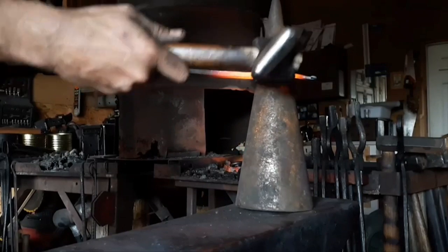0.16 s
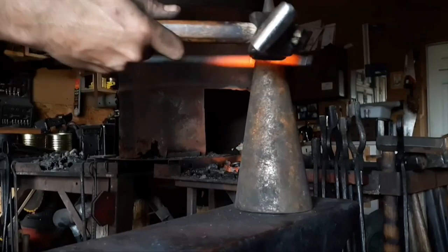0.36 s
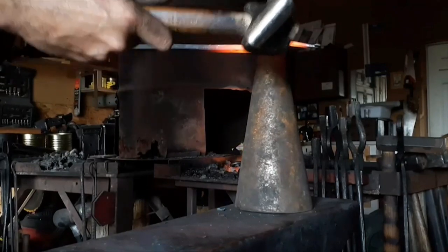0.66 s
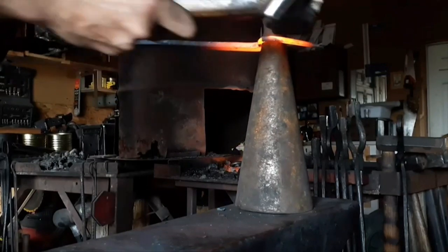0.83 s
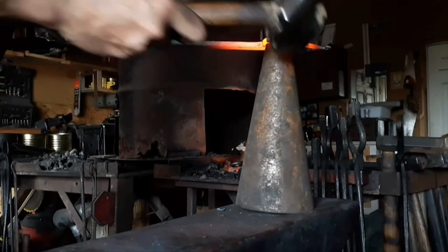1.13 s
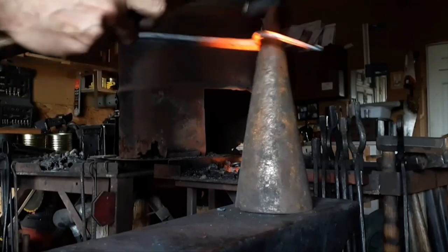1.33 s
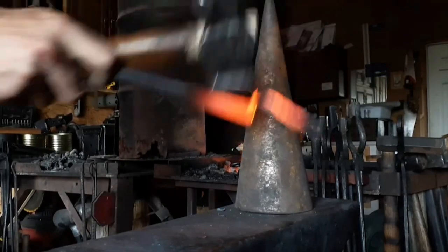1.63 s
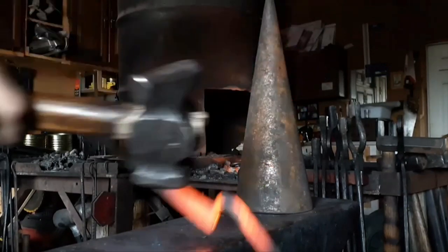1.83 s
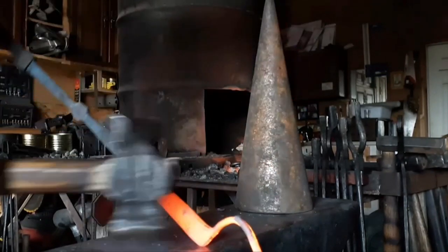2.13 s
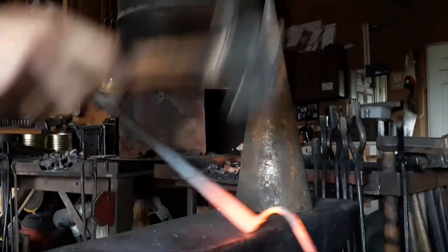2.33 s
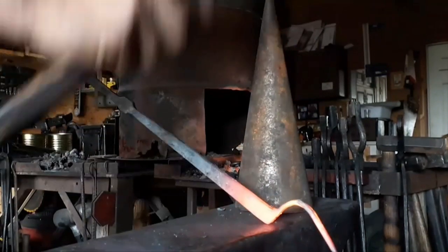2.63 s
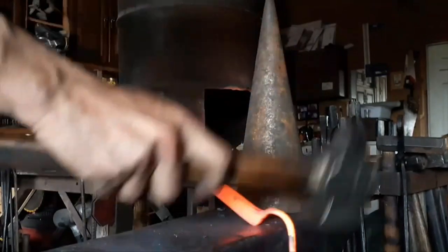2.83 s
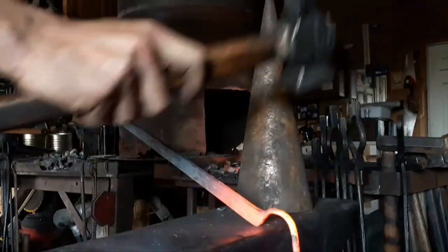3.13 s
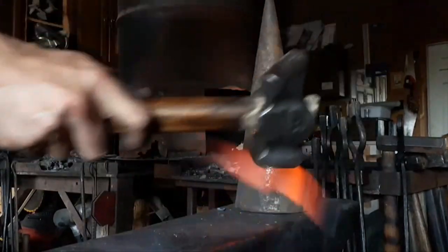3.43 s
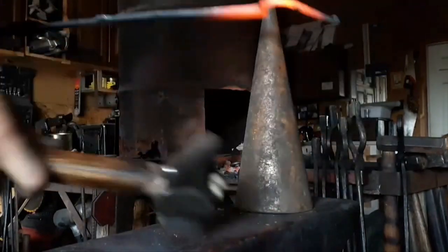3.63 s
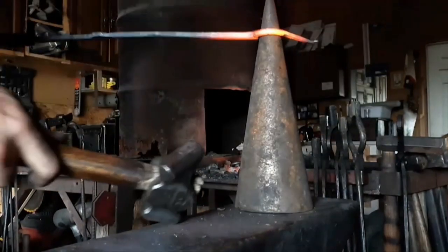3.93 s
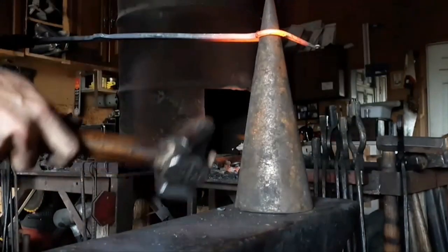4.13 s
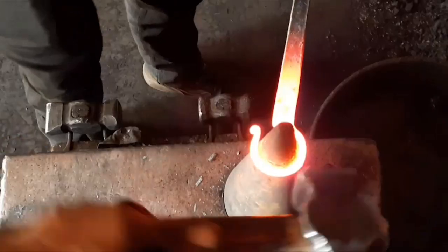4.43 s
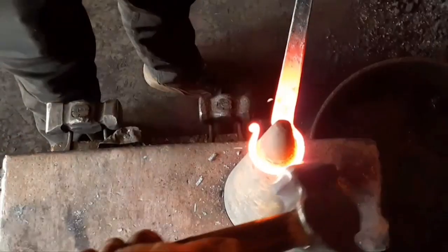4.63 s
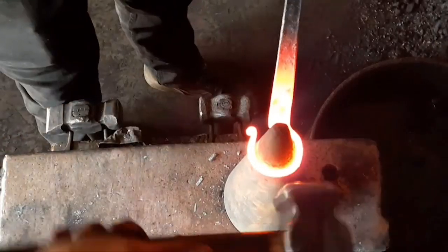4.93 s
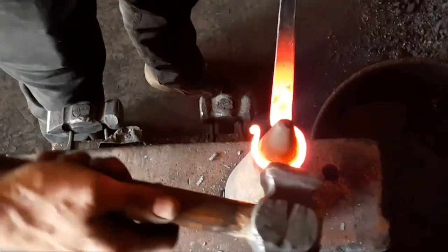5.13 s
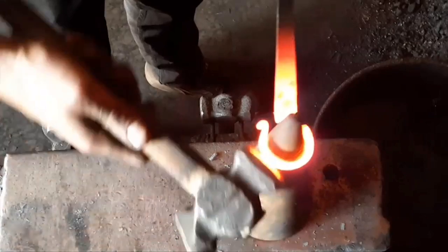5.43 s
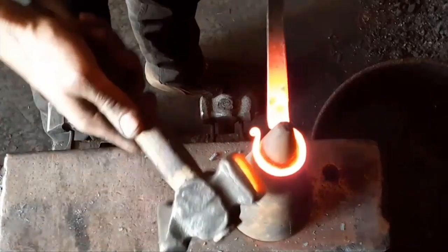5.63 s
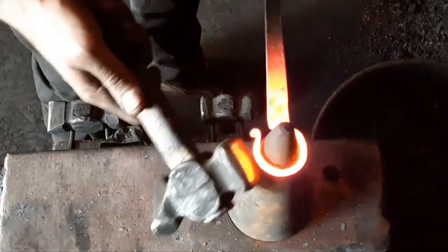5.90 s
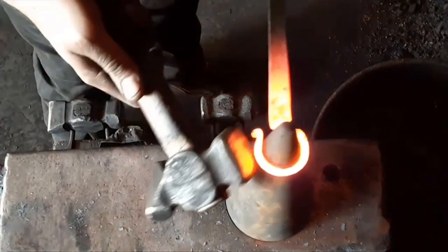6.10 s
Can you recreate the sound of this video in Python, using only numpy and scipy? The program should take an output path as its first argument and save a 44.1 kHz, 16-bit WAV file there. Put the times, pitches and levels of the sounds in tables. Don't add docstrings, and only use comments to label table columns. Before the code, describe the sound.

A small hard-walled forge heard close in stereo: quiet low blower rumble and hum, soft airy rustle, a very faint cricket-like chirp. A boot drags through grit at 0.1 s, with a dull thud and bright light taps around 0.2, then a short louder scrape at 0.5. A light tap comes at 1.0, a soft thud at 1.14, and a quick dull flurry near 1.45. Grit scuffs at 1.8, a dry tap at 2.0, then the loudest blow cracks at 2.17, ringing the anvil. A bright tap with low thumps lands at 2.85. At 3.73 a hard strike bounces ever faster and weaker until 3.98, ending in a small ping; the room booms low. Ringing and firm knocks fall at 4.7 and 5.1, a light tap at 5.5, a loud singing hammer tap at 5.79, a dry knock at 5.9, a firm tap at 6.03, and dull thumps until 6.25.

```python
import sys
import numpy as np
from scipy import signal
from scipy.fft import rfft, irfft
from scipy.io import wavfile
from scipy.ndimage import uniform_filter1d

SR = 44100
rng = np.random.default_rng(int(sys.argv[2]) if len(sys.argv) > 2 else 0)


def wav_record(signal):
    frames = np.transpose(np.atleast_2d(signal))
    bounded = np.clip(frames, -1, 1)
    quanta = np.round(bounded * 32767).astype(np.int16)
    wavfile.write(sys.argv[1], SR, quanta)


def ratio(d):
    e = np.asarray(d, float) / 20
    return 10 ** e


N = 276050
LATER_S = 4.42
LEFT_RIGHT = np.array([[1], [-1]])


def band(x, hz, width):
    return signal.lfilter(*signal.iirpeak(min(hz, .45 * SR), hz / width, SR), x)


def unit(x):
    return x / np.sqrt(np.mean(x ** 2))


def shaped(points, channels=2):
    hz, db = np.transpose(points)
    f = np.maximum(np.fft.rfftfreq(N, 1 / SR), 1)
    gain = ratio(np.interp(np.log(f), np.log(hz), db, left=-90, right=-90))
    return unit(irfft(rfft(rng.standard_normal((channels, N))) * gain, N))


def walk(rate):
    k = int(SR / rate)
    steps = np.repeat(rng.standard_normal(N // k + 1), k)
    return 0.61 * uniform_filter1d(steps, k)[:N]


def add(out, s, sound):
    i = int(s * SR)
    out[..., i:i + sound.shape[-1]] += sound[..., :N - i]


def bustle():
    # (time [s], level [dB])
    rustle = [(0, -62.5), (.4, -63.5), (.85, -75), (1.35, -69.5), (1.68, -78), (2.5, -72.5), (2.72, -79),
              (3.15, -76), (3.6, -80), (4.35, -82), (5, -78.5), (5.45, -76.5), (5.7, -77), (6.26, -70)]
    return np.interp(np.arange(N) / SR, *np.transpose(rustle))


def hiss():
    # (frequency [Hz], density [dB per Hz])
    colour = [(290, -32.5), (500, 0), (1850, -9.5), (4770, -11.5), (5200, -3), (6000, -8.5), (6930, -5.5),
              (8980, -8.5), (15500, -15.5)]
    return shaped(colour) * ratio(5 + bustle() + 1.8 * walk(9.9))


def blower():
    # (frequency [Hz], density [dB per Hz])
    rumble_colour = [(18, -67.5), (30, -32), (60, -2), (82, 2.5), (152, -26.5), (195, -3.5), (214, 6),
                     (250, -10), (271, -22), (700, -43), (910, -63), (1540, -120)]
    # (frequency [Hz], width [Hz], level [dB])
    motor = [(106, 7.7, -73), (214.7, 30, -66.5)]
    later_db = -1
    bustle_db = bustle()
    mid, side = shaped(rumble_colour)
    rumble_db = -68 + .3 * (bustle_db - bustle_db.mean()) + 2.2 * walk(7.4)
    rumble = (mid + .3 * side * LEFT_RIGHT) * ratio(rumble_db)
    hum = sum(ratio(db) * unit(band(rng.standard_normal(N), hz, w)) for hz, w, db in motor)
    return rumble + hum * ratio(later_db * (np.arange(N) / SR > LATER_S))


def cricket():
    level_db, later_db = -77, -8.5
    chirp = unit(band(band(rng.standard_normal((2, N)), 5300, 350), 5300, 500))
    later = np.arange(N) / SR > LATER_S
    return chirp * ratio(level_db + later_db * later + 7.0 * walk(25))


def booms():
    # (time [s], peak level [dB])
    jolts = [(0.03, -48.5), (0.269, -53), (0.499, -60), (0.989, -48), (1.137, -47.5), (1.459, -43),
             (2.169, -41.5), (2.844, -35), (3.728, -35), (3.818, -41), (3.896, -42), (3.951, -48.5),
             (5.129, -50.5), (5.79, -51)]
    boom_hz, boom_s = 51.33, 0.084
    out, t = np.zeros(N), np.arange(SR // 2) / SR
    swell = (t / boom_s * np.exp(1 - t / boom_s)) ** 2
    for s, db in jolts:
        hz = boom_hz * (1 + 0.036 * rng.standard_normal())
        add(out, s, ratio(db - 5) * swell * np.sin(2 * np.pi * hz * t))
    return np.array([.93 * out, np.roll(out, 12)])


def room(x):
    # (frequency [Hz], t60 [s], level [dB])
    walls = [(107, 0.52, 6), (324, 0.62, -4), (756, 0.41, -1), (1440, 0.47, -9.5), (3000, 0.45, -11),
             (6300, 0.3, -16.5), (12000, 0.29, -14.5)]
    t, tail = np.arange(int(.9 * SR)) / SR, 0
    for hz, t60, db in walls:
        noise = rng.standard_normal((2, len(t)))
        mid, side = band(band(noise, hz, 1.75 * hz), hz, 1.75 * hz)
        fade = ratio(-60 * t / t60) * np.minimum(t / 0.004, 1) / np.sqrt(t60 * SR / 14)
        tail = tail + ratio(db + 3.5) * fade * (mid + min(hz / 1100, 1) * side * LEFT_RIGHT)
    return signal.fftconvolve(x.mean(0)[None], tail, axes=1)[:, :N]


def broad(grains, body):
    return unit(sum(ratio(db) * band(band(grains, hz, w), hz, 2 * w) for hz, w, db in body))


def scuffs():
    # (loudest time [s], swell [s], drag level [dB], sole re drag [dB], grit re drag [dB])
    drags = [
        (0.106, 0.16, -35, -13, -8.5),
        (0.522, 0.063, -27.5, -15, -4.5),
        (1.2, 0.17, -66, 3, -22),
        (1.822, 0.084, -48, -4.5, -2.5),
        (2.56, 0.16, -64.5, -15, 1.5),
        (4.55, 0.13, -60.5, -0.5, -2),
        (5.38, 0.13, -62, 0.5, -11),
    ]
    # (frequency [Hz], width [Hz], level [dB])
    sole_body = [(324, 220, 3), (707, 140, 5.5)]
    drag_body = [(1395, 910, 10), (2165, 1300, 3)]
    grit_body = [(3550, 1500, 7.5), (6200, 4700, -2.5), (11900, 2000, -8.5)]
    swell_db, lift_db_per_s = 26, 402
    grain_db = 2.9 * np.minimum(rng.exponential(size=(2, N)), 4)
    grains = rng.standard_normal((2, N)) * ratio(grain_db) * ratio(1.5 * walk(60))
    grains = grains + .5 * grains[::-1]
    sole, drag, grit = (broad(grains, body) for body in (sole_body, drag_body, grit_body))
    out, t = 0, np.arange(N) / SR
    for s, swell_s, drag_db, sole_db, grit_db in drags:
        loss_db = np.where(t < s, swell_db * ((s - t) / swell_s) ** 2, lift_db_per_s * (t - s))
        scuff = drag + ratio(sole_db) * sole + ratio(grit_db) * grit
        out = out + ratio(drag_db - np.minimum(loss_db, 200)) * scuff
    return out


def thumps():
    # (time [s], peak level [dB], pitch [Hz])
    dull = [(0.266, -33, 280), (1.137, -37.5, 278), (1.455, -26, 292), (1.491, -27, 298),
            (1.53, -38.5, 268), (2.875, -39, 750), (2.895, -32, 720), (2.915, -37, 753),
            (2.935, -39.5, 757), (3.728, -27.5, 280), (3.82, -23.5, 288), (3.898, -23.5, 329),
            (3.945, -27.5, 326), (3.981, -28.5, 298), (4.074, -35, 463), (4.706, -23, 318),
            (5.123, -22.5, 328), (5.503, -30, 458), (5.701, -40.5, 380), (5.73, -30, 556),
            (5.902, -34, 478), (6.166, -31, 417), (6.186, -29, 497), (6.239, -28.5, 520)]
    damping_cycles, overtone, overtone_db = 0.78, 1.9, -10
    out, t = np.zeros(N), np.arange(SR // 10) / SR
    for s, db, hz in dull:
        cycles = hz * t
        tone = np.sin(2 * np.pi * cycles) + ratio(overtone_db) * np.sin(2 * np.pi * overtone * cycles)
        envelope = np.e * cycles / damping_cycles * np.exp(-cycles / damping_cycles)
        add(out, s - .0012, ratio(db) * envelope * tone)
    return out


def ring(modes, t, scatter_db, hold=0.75, detune=.001, twin_db=-4, flutter_db=0.):
    hz, db, t60 = np.tile(np.transpose(modes), 2)[:, :, None]
    luck = rng.standard_normal((4, len(hz), 1))
    k = int(.008 * SR)
    steps = ratio(flutter_db * rng.standard_normal((len(hz), len(t) // k + 1)))
    flutter = uniform_filter1d(np.repeat(steps, k, axis=1), k)[:, :len(t)]
    twin = np.arange(len(hz))[:, None] >= len(modes)
    decay_db = -60 * t / (hold * np.clip(t60, .02, .5))
    size = ratio(db + twin * twin_db + scatter_db * luck[0] + decay_db) * flutter
    phase = 2 * np.pi * hz * (1 + (detune + .012 * twin) * luck[1]) * t + twin * luck[3]
    lag = np.clip(hz / 1500, 0, 1) * 0.93 * np.sign(luck[2])
    ears = np.array([(size * np.sin(phase + ear * lag)).sum(0) for ear in (.5, -.5)])
    return ears / np.sqrt(np.sum(ratio(2 * db)) / 2)


def hits(events, modes, name, crack_hz, crack_s, fizz_db, fizz_s, hold, clang_db):
    # (frequency [Hz], level [dB], t60 [s])
    block = [(185, -11, 0.016), (261, 1, 0.034), (314, 2.5, 0.034), (379, 0.5, 0.079), (490, 1, 0.082),
             (592, -0.5, 0.097), (720, -1, .03)]
    scatter_db = {"face": .5, "horn": 2.5, "head": 1, "bar": 2, "soft": 3}
    twin_db = {"face": -8, "horn": -4, "head": -18, "bar": -3, "soft": -5}
    flutter_db = {"face": 2.5, "horn": 3, "head": .8, "bar": 5, "soft": 4}
    out, t = np.zeros((2, N)), np.arange(SR // 3) / SR
    for s, db, thud_db, ring_db in events:
        noise = rng.standard_normal((5, len(t)))
        contact = band(noise[0] + 2.0 * noise[1:3], crack_hz, crack_hz)
        contact = unit(band(contact, crack_hz, 1.4 * crack_hz))
        crack = contact * np.exp(-t / crack_s)
        rattle = band(noise[0] + 2.7 * noise[3:], .6 * crack_hz, 0.95 * crack_hz)
        rattle = unit(band(rattle, 0.82 * crack_hz, 1.6 * crack_hz))
        clang = ratio(-14.5 + clang_db) * rattle * np.exp(-t / 0.018)
        fizz = unit(band(band(noise[3:], 8000, 13000), 8000, 14000)) * np.exp(-t / fizz_s)
        thud = ring(block, t, 2.5, detune=0.04) * (1 - np.exp(-t / 0.0018))
        steel = ring(modes, t, scatter_db[name], hold=hold, twin_db=twin_db[name], flutter_db=flutter_db[name])
        sound = crack + clang + ratio(fizz_db) * fizz + ratio(thud_db) * thud + ratio(ring_db) * steel
        pan_db = 0 if s < LATER_S else -4.5
        onset = np.minimum(t / 0.0017, 1)
        add(out, s - .0012, sound * onset * ratio(db + pan_db * LEFT_RIGHT / 2))
    return out


def soft_knocks():
    # (time [s], peak level [dB], thud re peak [dB], ring re peak [dB])
    knocks = [
        (0.265, -29.5, -4, -18),
        (0.462, -37.5, 5, -19),
        (2.893, -42.5, 5.5, -24),
        (4.706, -25, -0.5, -9.5),
        (5.123, -26, -5.5, -11),
        (5.641, -46.5, -8, -9),
        (5.899, -34, -5, -26),
    ]
    dull_knocks = [
        (0.024, -35.5, 7.5, -14),
        (1.137, -44, 6, -14),
        (1.424, -51, 4, -19),
        (1.455, -34, 5, -4),
        (1.491, -34, 4, -6),
        (1.527, -45, 6, -6),
    ]
    # (frequency [Hz], level [dB], t60 [s])
    soft = [(612, 2, 0.039), (1146, -6, 0.22), (1267, -1.5, 0.036), (1603, 4.5, 0.12), (2290, -15.5, 0.08),
            (3767, -17.5, 0.051)]
    firm = hits(knocks, soft, "soft", crack_hz=1390, crack_s=0.0026, fizz_db=-24.5, fizz_s=0.024,
                hold=0.53, clang_db=0.5)
    return firm + hits(dull_knocks, soft, "soft", crack_hz=794, crack_s=0.005, fizz_db=-49, fizz_s=0.02,
                       hold=0.4, clang_db=-0.5)


def bar_taps():
    # (time [s], peak level [dB], thud re peak [dB], ring re peak [dB])
    taps = [
        (0.206, -30.5, -47, -6.5),
        (0.992, -30.5, -7, -10.5),
        (1.978, -29.5, -20, -20.5),
        (2.84, -21, -11.5, -10.5),
        (5.288, -50.5, -7, -7),
    ]
    # (frequency [Hz], level [dB], t60 [s])
    bar = [(720, -5, 0.24), (1234, -15, .1), (2280, 2, 0.21), (2506, -0.5, 0.35), (3600, -6.5, 0.34),
           (4450, 1, 0.028), (5400, -2.5, 0.38), (8300, -7.5, 0.24)]
    return hits(taps, bar, "bar", crack_hz=3200, crack_s=0.0034, fizz_db=-9, fizz_s=0.04,
                hold=0.44, clang_db=1.5)


def head_taps():
    # (time [s], peak level [dB], thud re peak [dB], ring re peak [dB])
    taps = [
        (0.219, -40, 3.5, 1.5),
        (4.327, -80, -5, -3),
        (5.497, -28.5, -7.5, -6.5),
        (5.785, -11.5, -16, 1.5),
        (6.027, -16.5, -19.5, -4),
    ]
    ping = [
        (4.009, -31, -12, 11),
    ]
    # (frequency [Hz], level [dB], t60 [s])
    head = [(3370, 7.5, 0.13), (3445, -7, 0.1), (5400, -14.5, 0.24), (5536, -10.5, 0.16), (7880, -17, 0.2),
            (9770, -32, 0.28), (11700, -21, .12)]
    return hits(taps + ping, head, "head", crack_hz=2110, crack_s=0.0025, fizz_db=-20, fizz_s=0.0023,
                hold=0.53, clang_db=-3)


def bounces():
    # (time [s], peak level [dB], thud re peak [dB], ring re peak [dB])
    strikes = [
        (3.728, -4, -24, -7),
        (3.819, -4.5, -24, -8),
        (3.897, -7.5, -22, -9),
        (3.944, -12, -22, -10),
        (3.979, -20, -14, -10),
    ]
    # (frequency [Hz], level [dB], t60 [s])
    horn = [(700, 4, 0.034), (1096, 1, 0.14), (1136, -3, 0.24), (1247, -7, 0.3), (1435, 1.5, 0.12),
            (1670, 9, 0.11), (1990, 4.5, 0.091), (2292, -8.5, 0.3), (2660, 0.5, .08), (3000, 3.5, .13),
            (3347, 0, 0.12), (4220, -15.5, .08), (8100, -31, 0.083), (11700, -10.5, .12)]
    return hits(strikes, horn, "horn", crack_hz=2407, crack_s=0.0025, fizz_db=-29, fizz_s=0.005,
                hold=0.43, clang_db=-17)


def heavy_blow():
    # (time [s], peak level [dB], thud re peak [dB], ring re peak [dB])
    blow = [
        (2.166, 3, -28, -10.5),
    ]
    # (frequency [Hz], level [dB], t60 [s])
    face = [(1146, -12.5, 0.27), (1255, -12.5, 0.18), (1590, -8.5, 0.28), (2022, -10.5, 0.55),
            (2316, -12, .35), (2484, -13.5, 0.4), (2530, -5, .36), (2909, -13.5, .4), (3049, -8.5, 0.26),
            (3428, 2, 0.047), (4490, -12, 0.47), (8100, -26, 0.12), (10390, -28, .09), (12600, -20.5, 0.29)]
    return hits(blow, face, "face", crack_hz=2500, crack_s=0.0015, fizz_db=-29, fizz_s=0.0027,
                hold=0.39, clang_db=-7)


def scene():
    background = hiss() + blower() + cricket()
    near = scuffs() + soft_knocks() + bar_taps() + head_taps() + bounces() + heavy_blow()
    close = thumps()
    reflections = ratio(3.5) * room(near + ratio(-10) * close)
    return near + close + reflections + booms() + background


def low_pass(x):
    return signal.sosfilt(signal.butter(12, 16420, fs=SR, output="sos"), x)


def record(dry):
    gate_hz, gate_s = 450, 0.025
    gate_db, gate_range_db, gate_slope = -60, 2.5, 1.2
    heard = signal.sosfilt(signal.butter(6, 14500, fs=SR, output="sos"), dry)
    treble = signal.sosfiltfilt(signal.butter(2, gate_hz, "high", fs=SR, output="sos"), heard)
    power = np.abs(uniform_filter1d((treble ** 2).mean(0), int(gate_s * SR)))
    level_db = 10 * np.log10(power + 1e-12)
    duck_db = np.clip(gate_slope * (level_db - gate_db), -gate_range_db, 0)
    mix = np.clip(heard - treble * (1 - ratio(duck_db)), -1, 1)
    return low_pass(mix)


dry = scene()
out = record(dry)
wav_record(out)
```